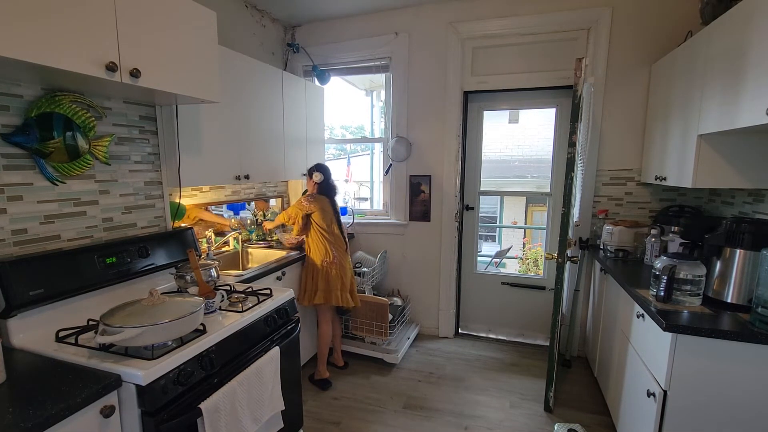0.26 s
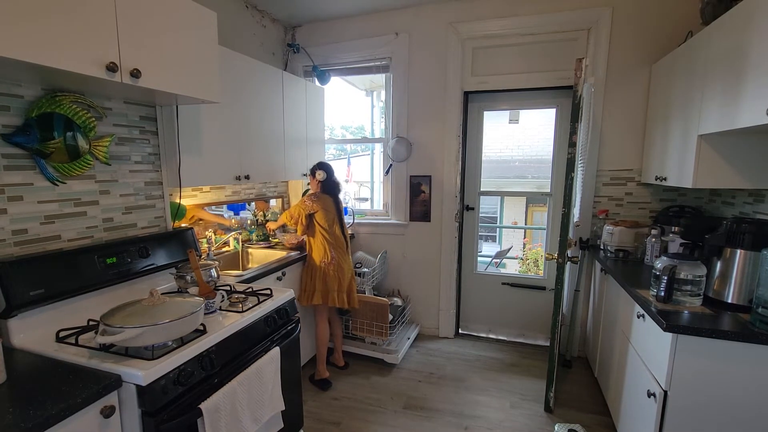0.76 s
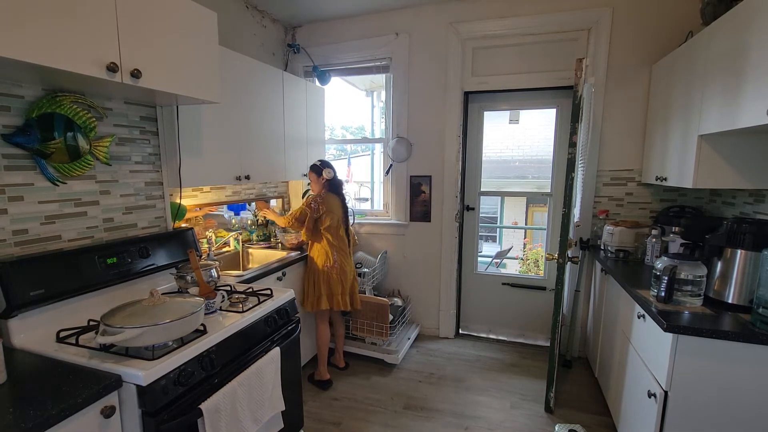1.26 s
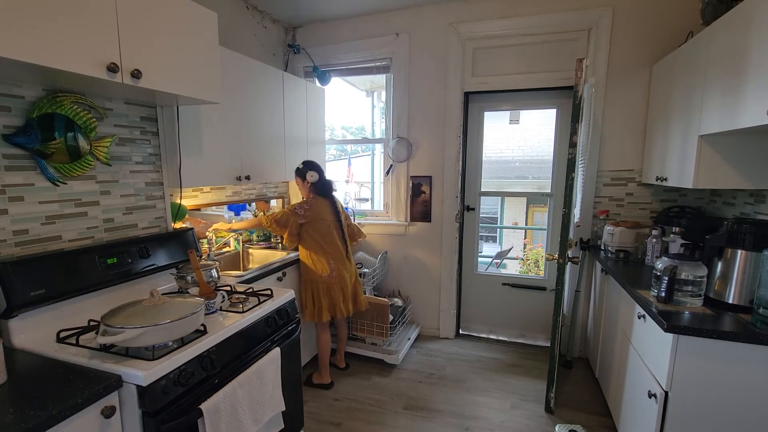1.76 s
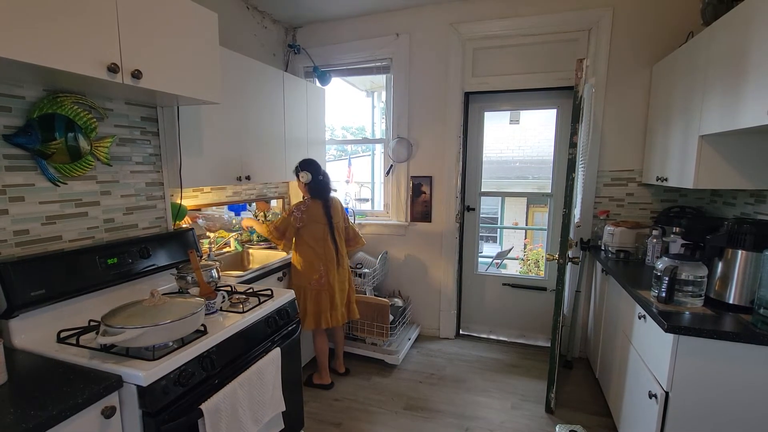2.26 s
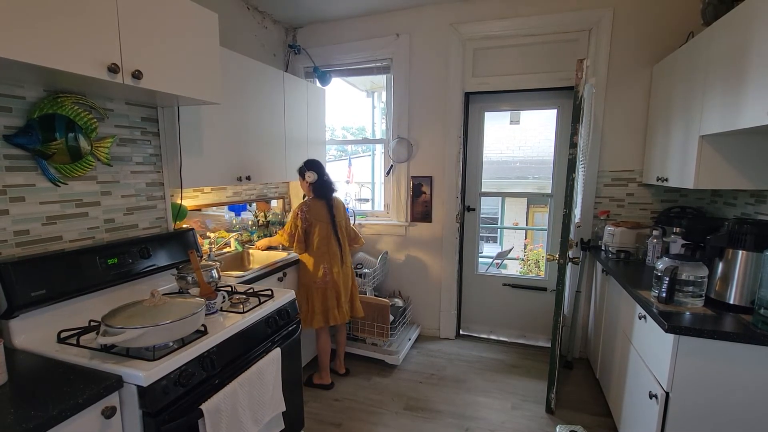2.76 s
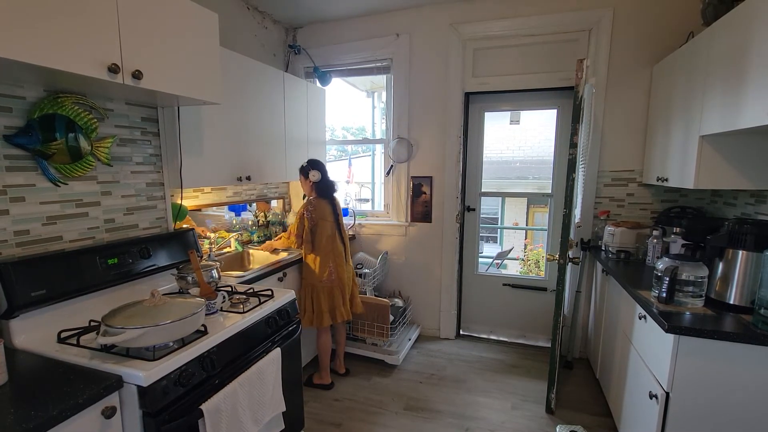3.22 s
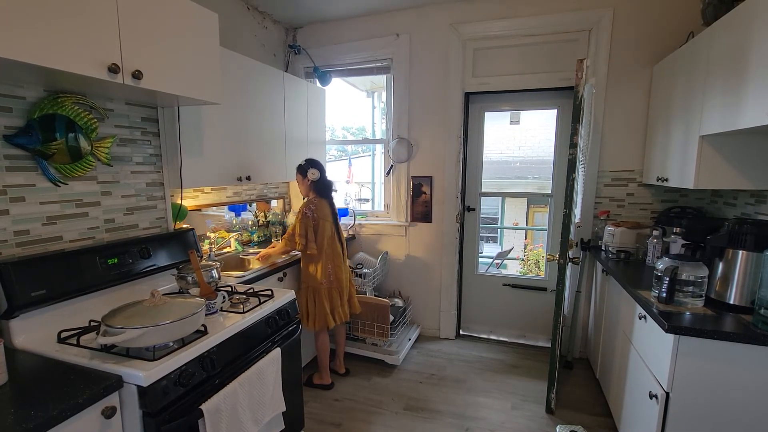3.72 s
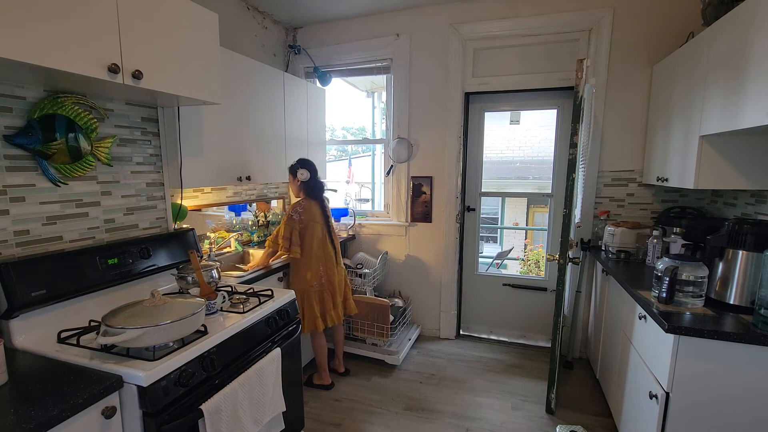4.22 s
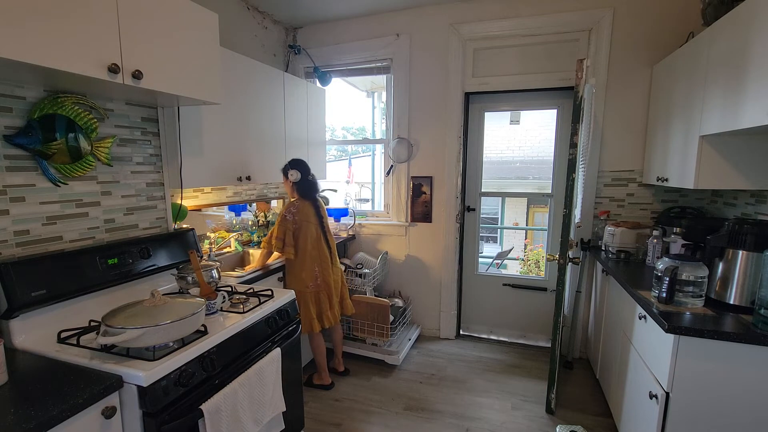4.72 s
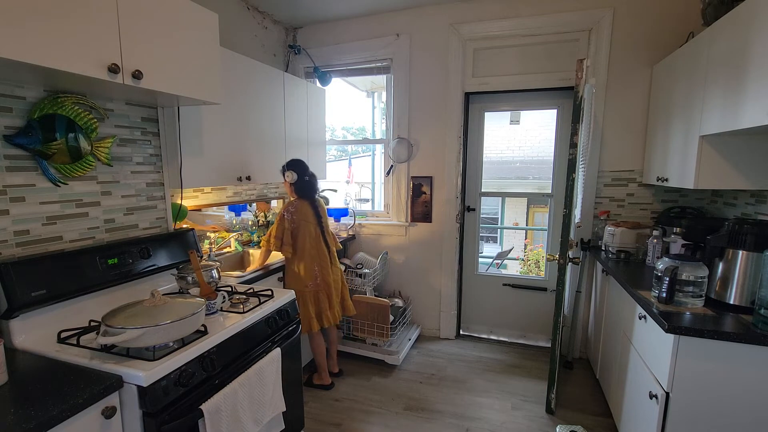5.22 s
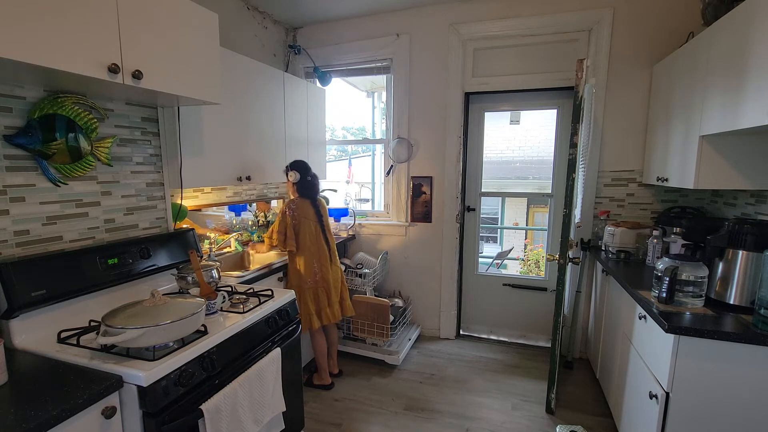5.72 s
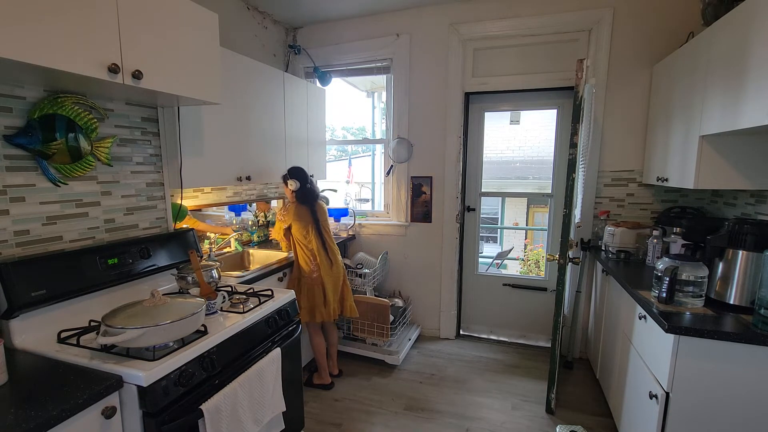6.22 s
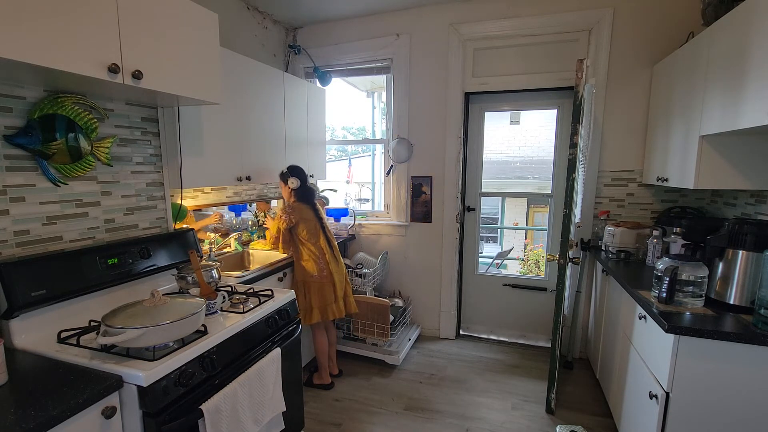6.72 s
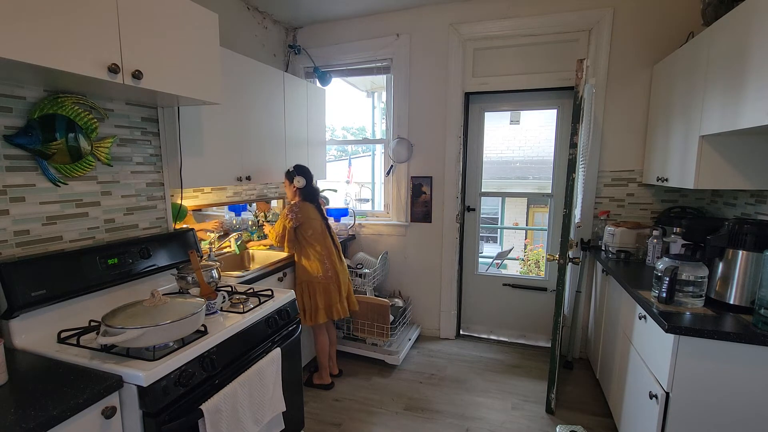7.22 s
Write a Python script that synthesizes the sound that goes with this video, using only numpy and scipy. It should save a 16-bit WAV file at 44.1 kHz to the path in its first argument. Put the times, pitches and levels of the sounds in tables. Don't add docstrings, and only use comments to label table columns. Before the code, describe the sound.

Running water stops after two seconds, followed by cups, plates and pans knocking brightly at a sink over a faint fridge hum.

```python
import sys
import numpy as np
from scipy import signal
from scipy.fft import rfft, irfft, next_fast_len
from scipy.io import wavfile
from scipy.ndimage import uniform_filter1d

SR = 44100
rng = np.random.default_rng(int(sys.argv[2]) if len(sys.argv) > 2 else 0)


def convert_level_to_amplitude(level_db):
    exponent = np.asarray(level_db, float) / 20
    return 10 ** exponent


def generate_wav(sig):
    pcm = np.round(np.clip(np.atleast_2d(sig).T, -1, 1) * 32767).astype(np.int16)
    wavfile.write(sys.argv[1], SR, pcm)


N = 329781

# (frequency [Hz], level per Hz [dB])
AIR_COLOUR = [(12, -58), (20, -17), (33, -15), (48, -3), (72, 2), (90, -29), (114, -4), (164, -10),
              (219, -6), (359, -6), (441, -12.5), (516, -10.5), (1040, -16.5), (1460, -21.5), (2100, -24),
              (3400, -27), (4700, -33), (6600, -33), (10000, -44.5), (13000, -68), (22000, -120)]
# (frequency [Hz], side minus mid [dB])
AIR_SIDE = [(60, -12.5), (110, -19), (200, -9.5), (380, -3), (700, 3.5), (1290, 7.5), (2380, 0.5),
            (4400, 0.5), (8120, 0.5), (15000, -1)]
AIR_DB, AIR_SWELL_DB = -55, 1
# (frequency [Hz], width [Hz], level [dB])
FRIDGE_HUM = [(63, 10, -4.5), (126, 15, -1.5)]
HUM_DB, HUM_WAVER_DB = -68, 5
FRIDGE_EASES_S, HUM_EASE_DB_PER_S, RUMBLE_EASE_DB_PER_S = 6.77, -27, -12
# (frequency [Hz], level [dB])
FAN_WHINE = [(529, -69.5), (1038, -74), (1759, -90), (1942, -83), (2811, -87), (3148, -88), (3506, -87),
             (3978, -88)]
FAN_WIDTH_HZ = 14.5
# (time of most weight [s], length [s], level [dB])
FOOTING = [
    (0.397, 0.09, -57),
    (0.53, 0.22, -49),
    (1.03, 0.091, -44.5),
    (1.283, 0.45, -50.5),
    (1.642, 0.51, -49),
    (6.9, 0.22, -67),
]

# (time [s], flow [dB])
TAP_FLOW = [
    (0.0, -54.5),
    (1.69, -55),
    (2.06, -60),
    (2.1, -64),
    (2.16, -65.5),
    (2.3, -92),
]
# (frequency [Hz], level per Hz [dB])
JET_COLOUR = [(350, -6), (600, -1), (832, -10), (1030, -7.5), (1490, -7), (1910, -3.5), (2280, -10.5),
              (2790, -8), (3160, -10), (3420, -7.5), (4430, -10.5), (7140, -8), (11000, -12.5),
              (13000, -11.5), (15500, -11.5)]
# (frequency [Hz], side minus mid [dB])
JET_SIDE = [(60, -12), (110, -15), (200, -9), (380, -4), (700, -7), (1290, 1.5), (2380, 1), (4400, 1),
            (8120, 0), (15000, 0)]
JET_FLICKER_DB = 1
# (frequency [Hz], width [Hz], level [dB])
BASIN_SONG = [(553, 14, 1.5), (1620, 40, -2), (1914, 24, 1.5), (2805, 27, -1.5), (3620, 250, -9),
              (3970, 27, -4)]
BASIN_STOPS_S, BASIN_FADE_S = 1.99, 0.1

# (frequency [Hz], t60 [s])
WALL_T60 = [(100, 0.17), (250, 0.47), (700, 0.33), (2500, 0.4), (6000, 0.39), (12000, 0.38)]
# (frequency [Hz], level [dB])
WALL_COLOUR = [(150, -12), (240, 1), (300, -1), (600, 4), (1200, -1.34), (2400, -0.7), (4000, 2.5),
               (7000, 5), (11000, -2), (13500, -4), (16000, -3.5)]
# (frequency [Hz], side minus mid [dB])
WALL_SIDE = [(60, -6), (110, -21), (200, -6.5), (380, -2), (700, 0.5), (1290, 3.5), (2380, 1.5),
             (4400, 0.5), (8120, 0), (15000, 1)]
# (frequency [Hz], level [dB], t60 [s], left minus right [dB])
ROOM_MODES = [(65.7, -25.5, 0.46, -1), (123.6, -25, 0.32, 3), (162, -20, 0.26, -0.5),
              (193.9, -22.5, 0.29, -2), (233.3, -38.5, 1, -3)]

# (time [s], frequency [Hz], level [dB], t60 [s])
FREE_TONES = [(0.839, 628, -13, 0.076), (0.836, 2290, -34, 0.16), (2.355, 610, -20.5, 0.11),
              (2.53, 618, -38, 0.3), (3.44, 415, -36, 0.69), (3.44, 542, -40.5, 0.59),
              (3.637, 2635, -41.5, 0.14), (3.703, 637, -18, 0.082), (3.705, 2012, -26, 0.2),
              (3.705, 4070, -41, 0.23), (4.377, 531, -24.5, 0.3), (4.376, 1593, -37, 0.29),
              (5.29, 375, -31.5, 0.32), (5.29, 2104, -39, 0.49), (6.2, 529, -52, 0.2),
              (4.675, 752, -39, 0.15), (4.99, 2030, -43, 0.17), (5.361, 1010, -38, 0.27)]
# (time [s], level [dB], [(frequency [Hz], level [dB], t60
# [s])])
DISH_RINGS = [
    (3.268, -39.5, [(1400, -17, 0.22), (1620, -14, 0.23), (2600, -8, 0.14), (3047, -19, 1.1), (4160, -18, 0.43), (6029, -26, 0.37), (7607, -33, 0.51), (9070, -4, 0.21)]),
    (3.706, -30, [(2778, 0, 0.41), (4296, -1, 0.14), (3354, -14, 0.23), (4829, -3.5, 0.46), (5884, -5, 0.29), (7467, -11, 0.25), (8204, -11, 0.11), (9100, -7, 0.31), (9300, -18, 0.24), (10200, -21, 0.3), (11610, -30, 0.28), (12600, -24, 0.38)]),
    (4.379, -38, [(2150, -1.5, 0.51), (3040, 2, 0.34), (3500, 0, 0.2), (4247, -19, 0.51), (7224, -20, 0.57), (8845, -18, 0.42), (9523, -22, 0.35), (9927, -17, 0.19), (10860, -21, 0.2), (11910, -23, 0.26)]),
    (5.289, -35.5, [(1620, -8, 0.19), (1986, -16, 0.37), (2137, -4, 0.6), (2579, -5, 0.45), (2860, -4, 0.34), (3580, -8, 0.6), (4330, -17, 0.54), (5717, -12, 0.32), (7520, -12, 0.17)]),
              (0.838, -25, [(388, 0, 0.25), (526, -11, 0.2), (910, -10, 0.18), (267, -4, .2),
              (1750, -20, 0.22), (4140, -16.5, .13)]), (0.872, -27.5, [(701.4, 4, 0.22), (162, 1.5, 0.15)]),
              (2.354, -41, [(1070, -2, 0.25), (1490, -8, .25), (1970, -10, .18), (3740, -14, .3),
              (6860, -19, .11)]), (3.268, -35.5, [(648, 6, 0.085), (396, -4, 0.57)]),
              (4.512, -45, [(535, 3.5, 0.51), (1000, 1, 0.26)]), (4.378, -38.5, [(1000, 11.5, 0.093),
              (788, 2, 0.48)]), (4.945, -43, [(1480, 0, .3), (1690, -1, .3)]), (5.264, -32, [(183, 1, 0.22),
              (345, -5.5, 0.22), (1010, -6.5, 0.17)]), (4.736, -36, [(199.4, 5.5, 0.36)]),
              (6.199, -49, [(395, 3, .2), (638, -3, .15), (302, -7, .2)]), (4.43, -52, [(4760, -1, .3),
              (5600, -5, .3), (6300, -7, .3)]), (5.35, -58, [(4770, -1, .3), (6100, -6, .3)]),
              (1.145, -55, [(3930, -2, 0.28), (3700, -2, .2)]), (2.476, -30, [(182, 7, .08)]),
              (3.289, -26, [(181, 0.5, 0.11)]), (3.432, -26, [(204, -1, 0.051)]),
              (3.456, -22, [(183, 4, 0.11)]), (3.701, -24, [(180, 2, .08)]),
              (3.726, -19, [(172.5, 1, 0.115)]), (4.375, -26, [(180, -2.5, 0.103)]),
              (4.496, -33.5, [(189, 1.5, 0.24)]), (7.291, -53.5, [(2980, -1, .1), (963, 4, .1),
              (4300, -4, 0.088)]), (7.436, -56, [(2700, -2, .3), (6150, -5, .2), (9100, -4, .2)]),
              (7.457, -41.5, [(734, 1, .2), (1510, -1, .2), (4130, -2, .2)])]
TONE_WAVER_DB, RING_LONGEST_S = 6, 0.4

# (time [s], level [dB], frequency [Hz])
CABINET_BOOMS = [
    (0.837, -49, 72.7),
    (2.347, -21, 100),
    (2.449, -18, 87),
    (3.701, -44, 94.2),
    (4.375, -53, 95.5),
    (4.482, -27, 82),
    (5.28, -25, 81.02),
    (2.82, -38, 94),
    (6.07, -41, 100),
]
# (time [s], length [s], rasp [dB], thud
# [dB], body [dB])
DRAGS = [
    (2.681, 0.72, -62, -50, -51),
    (3.436, 0.091, -40.5, -41, -28),
    (4.621, 0.1, -29, -58, -46),
    (4.901, 0.18, -27.5, -43.5, -71),
]
# (frequency [Hz], width [Hz], level [dB])
DRAG_MODES = [
    [(1340, 16, 1), (1980, 43, -11), (2543, 85, 12), (3880, 55, 9)],
    [(1970, 32, -1), (2250, 37, -10), (4000, 120, -3), (4650, 55, 0), (5830, 140, -1), (7500, 130, -11)],
    [(1290, 30, 7), (1690, 120, 5), (2640, 45, 5.5), (3600, 69, 2.5), (4570, 27, -4), (5200, 340, -15),
     (5930, 43, -9), (9200, 53, -22)],
    [(1620, 180, -0.5), (2030, 94, -3), (2500, 34, 3.5), (3720, 110, -6), (4030, 37, -10.5),
     (5200, 400, -19), (6400, 43, -21), (7200, 88, -27)],
]
# (rise [share], fall [share], grit [dB], finest grit [dB])
DRAG_SHAPE = [
    (0.052, .074, -27, -38),
    (0.31, 0.13, -13, -13),
    (0.11, 0.082, -24, -24),
    (0.23, 0.45, -30, -34),
]

# (time [s],
# clack [dB], thud [dB], body [dB], tick [dB])
BLOWS = [(0.2728, -39, -9, -48, -16), (0.8345, -32.5, -6, 18.5, -19.5), (1.1429, -49.5, -11, -11, 1),
         (1.9836, -46.5, 11, -8, -3), (2.1306, -46, 0.5, -5.5, -12.5), (2.3509, -27.5, 15, 6, -15.5),
         (2.5152, -35, 12.5, 5.5, -14.5), (2.7998, -49, -4, -1, -17), (3.2632, -19, -4.5, -8, -17),
         (3.428, -31.5, 6, -4, -17), (3.634, -34.5, -26, -17, -20), (3.7008, -13, -5.5, -14, -9),
         (4.3377, -36.5, -13, -8, -11), (4.3746, -19.5, -0.5, -10, -14), (4.728, -30.5, 1, -5, -29),
         (5.2602, -32, -6, 2.5, -17), (5.2869, -18.5, -9.5, -12.5, -28), (6.1954, -74, 31, 32, -28),
         (7.289, -46, -10, -4, -15), (7.4562, -29, -21, -8, -21)]
# (time [s], clack [dB], thud [dB], body [dB])
BOUNCES = [(0.8737, -55, 27, 21), (2.0346, -42.5, -3, -28), (2.4502, -45, 17, 9.5),
           (2.4816, -48.5, 23.5, 7), (2.5514, -45.5, 22.5, 10.5), (2.5837, -56, 29, 18),
           (3.109, -63, 4, -17), (3.1939, -48, 11, -4), (3.2932, -26.5, -14, -1.5), (3.348, -31.5, 0, -2),
           (3.4613, -47, 6, -8), (3.7168, -23, 4.5, -9), (4.3927, -26.5, -14, -10), (4.4372, -29.5, 0, -10),
           (4.489, -36, 7.5, -5), (4.5192, -34.5, -20, -1.5), (4.885, -43.5, 1, -2.5),
           (5.045, -44.5, 3, -2), (5.366, -37, 1, -0.5), (6.2277, -69.5, 32, 3), (7.464, -32.5, -35, -2)]
# (time [s], clack [dB], thud [dB], body [dB], tick [dB])
CATCHES = [(0.893, -62, -3, 10, -22), (2.548, -40, 16.5, 2, -24), (3.303, -34.5, -18, -8, -17),
           (4.664, -30.5, -17, -19, -23), (4.682, -40, -16, -22, -22), (4.744, -39, 3.5, 6.5, -15),
           (4.945, -50, -21, -7, -12), (4.988, -37, -23, -19, -20), (5.015, -39, -21, -9, -20),
           (5.062, -44.5, -36, -1, -25), (5.276, -34, -14, -3, -18), (3.755, -28, -4, -18, -12),
           (3.796, -38, -15, -15, -16), (7.434, -46, -25, -29, -6), (5.47, -41.5, -20, -9, -28)]
BLOW_HZ = (170, 480, 1150, 2800, 9000)
BLOW_WIDTH_HZ = (170, 450, 800, 2700, 8000)
BOUNCE_TICK_DB = -20
KNOCK_SHARE, KNOCK_DB = 0.74, 2.5
TOP_HZ, TOP_DB = 15000, -2
# (time [s], level [dB], [(frequency [Hz], width [Hz], level [dB])])
STRUCK_DISHES = [
    (0.275, -56, [(3620, 48, -6), (5040, 36, -8), (5950, 28, 0)]),
    (0.835, -22, [(371, 85, 2), (890, 44, -1.5), (1210, 48, -0.5), (1830, 72, -6.5), (2250, 32, -14), (4100, 40, -11)]),
    (2.351, -25.5, [(626, 40, 2.5), (1050, 63, -9), (1480, 20, -10), (2060, 120, -12), (2610, 17, -2.5), (3680, 36, -4.5), (4160, 34, -4), (4850, 27, -6.5), (5200, 300, -23)]),
    (2.515, -38.5, [(700, 46, 8), (1580, 62, -8), (2250, 160, 0.5), (3700, 63, -5), (4300, 60, -5), (5300, 400, -15)]),
                 (3.265, -33, [(174, 34, -5), (1360, 56, 5), (1590, 35, 6.5), (2260, 81, 2), (2575, 29, 5), (3560, 34, 1.5), (4030, 58, 0), (4430, 38, -14), (4800, 100, -2.5), (5940, 55, -18), (7650, 42, -24)]),
    (3.43, -28, [(181, 34, 3), (533, 96, -17), (813, 31, -17)]),
    (3.637, -35.5, [(1540, 29, -1.5), (2550, 37, 0), (3930, 34, -7), (4260, 31, -3.5)]),
    (3.702, -17, [(174, 44, -2), (730, 93, -2.5), (1550, 31, -2), (2030, 32, -14), (2415, 320, -3), (4040, 150, -4), (5140, 39, -7), (5800, 69, -16), (6350, 63, -14), (7400, 40, -17), (8260, 66, -20), (8600, 86, -27)]),
                 (4.337, -45.5, [(1504, 27, 5), (2300, 25, 2), (3600, 31, 3), (4430, 63, 1.5)]),
    (4.377, -26, [(1620, 25, 1), (2710, 54, -13), (3060, 150, -16), (3660, 76, -14), (3970, 29, -1), (4720, 92, -5.5), (5750, 33, -19), (7500, 32, -16)]),
    (5.288, -36.5, [(372, 19, -5), (1510, 36, 5.5), (2030, 31, -13), (2680, 70, 3.5), (3570, 67, 1.5), (4360, 67, -13), (4770, 91, -2.5), (7630, 34, -21)]),
]

# (frequency [Hz], left minus right [dB])
PORT_BALANCE = [(30, -1.6), (60, -1), (125, -0.9), (250, -3), (500, 1), (1000, -1.1), (2000, 1),
                (4000, 0.3), (12000, 0)]
# (frequency [Hz], level per Hz [dB])
MIC_HISS = [(3000, -32), (7000, 2.5), (10000, -10), (13000, -1.5), (15700, -2.5)]
MIC_HISS_DB = -80


def read(table, hz):
    f, v = np.transpose(table)
    return np.interp(np.log(np.maximum(hz, 1)), np.log(f), v)


def unit(x):
    return x / np.sqrt(np.mean(x ** 2))


def shaped(x, gain):
    length = x.shape[-1]
    size = next_fast_len(length, True)
    x_long = np.concatenate([x, x[..., :size - length]], axis=-1)
    spectrum = rfft(x_long) * gain(np.fft.rfftfreq(size, 1 / SR))
    return irfft(spectrum, size)[..., :length]


def ports(size, gain, side):
    mid = shaped(rng.standard_normal(size), gain)
    dif = shaped(rng.standard_normal(size), lambda f: gain(f) * convert_level_to_amplitude(read(side, f)))
    return np.array([mid + dif, mid - dif]) / np.std(mid)


def humps(hz, peaks):
    return np.sqrt(sum(convert_level_to_amplitude(db) ** 2 / (1 + (2 * (hz - f) / w) ** 2) for f, w, db in peaks))


def resonance(x, hz, width):
    return unit(shaped(x, lambda f: humps(f, [(hz, width, 0)]) ** 2))


def dying(t, t60):
    return np.exp(-np.log(1000) * t / t60)


def walk(rate):
    k = int(SR / rate)
    held = np.repeat(rng.standard_normal(N // k + 1), k)
    return 0.81 * uniform_filter1d(uniform_filter1d(held, k), k)[:N]


def causal(db_per_hz, size=2048):
    cep = irfft(db_per_hz * np.log(10) / 20, size)
    cep[1:size // 2] *= 2
    cep[size // 2 + 1:] = 0
    return irfft(np.exp(rfft(cep)), size)


def add(track, s, x):
    i = int(s * SR)
    track[i:i + len(x)] += x[:N - i]


def air(flicker_db=3.5):
    bed = ports(N, lambda f: convert_level_to_amplitude(read(AIR_COLOUR, f)), AIR_SIDE)
    swell_db = AIR_SWELL_DB * walk(0.68)
    eased_s = np.maximum(np.arange(N) / SR - FRIDGE_EASES_S, 0)
    out = 0
    for hz in 15.6 * 2. ** np.arange(11):
        band = shaped(bed, lambda f: np.cos(np.pi / 2 * np.clip(np.log2(np.maximum(f, 1) / hz), -1, 1)) ** 2)
        ease_db = (hz < 70) * RUMBLE_EASE_DB_PER_S * eased_s
        breath_db = flicker_db * min(1, 400 / hz) * walk(11)
        out = out + band * convert_level_to_amplitude(ease_db + swell_db + breath_db)
    load_db = HUM_DB + HUM_WAVER_DB * walk(3.47) + HUM_EASE_DB_PER_S * eased_s
    for hz, width, db in FRIDGE_HUM:
        hum = resonance(rng.standard_normal(N), hz, width)
        out = out + convert_level_to_amplitude(db - AIR_DB + load_db) * hum
    return out * convert_level_to_amplitude(AIR_DB)


def fan():
    def whistles(f):
        return np.sqrt(sum(humps(f, [(hz, FAN_WIDTH_HZ, 0)]) ** 4 * convert_level_to_amplitude(db) ** 2 for hz, db in FAN_WHINE))

    return shaped(rng.standard_normal((2, N)), whistles) * np.sqrt(SR / FAN_WIDTH_HZ)


def shuffle():
    modes = [(136.7, 9.1, 1.5), (170, 80, -1.0), (224, 27, 0.5)]  # (frequency [Hz], width [Hz], level [dB])
    board = unit(shaped(rng.standard_normal(N), lambda f: humps(f, modes) ** 2))
    t = np.arange(N) / SR
    weight = sum(convert_level_to_amplitude(db) * np.clip(1 - np.abs(t - s) / (length / 2), 0, 1) for s, length, db in FOOTING)
    return board * weight * convert_level_to_amplitude(-5.0)


def tap(bubbles_per_s=350, cycles=7, bubble_db=-9, basin_db=-8):
    s, db = np.transpose(TAP_FLOW)
    t = np.arange(N) / SR
    flow = np.interp(t, s, convert_level_to_amplitude(db), right=0)
    hiss = ports(N, lambda f: convert_level_to_amplitude(read(JET_COLOUR, f)) * (f > 250), JET_SIDE)
    hiss = hiss * convert_level_to_amplitude(JET_FLICKER_DB * walk(20.7))
    basin = ports(N, lambda f: humps(f, BASIN_SONG) ** 2, JET_SIDE)
    basin = basin * convert_level_to_amplitude(basin_db + 1.5 * walk(4))
    basin = basin * np.clip((BASIN_STOPS_S - t) / BASIN_FADE_S, 0, 1)
    fizz, blip_t = np.zeros((2, N)), np.arange(512) / SR
    for when, pitch, loud, place in rng.random((int(bubbles_per_s * s[-1]), 4)):
        hz = 1200 * 7 ** pitch
        swing = np.sin(2 * np.pi * hz * blip_t * (1 + 0.0062 * hz * blip_t))
        blip = swing * np.exp(-3 * hz * blip_t / cycles) * (0.39 + loud)
        add(fizz[int(2 * place)], when * s[-1], blip)
    fizz = fizz / np.std(fizz[:, :int(s[-1] * SR)])
    return flow * convert_level_to_amplitude(2.54) * (hiss + basin + convert_level_to_amplitude(bubble_db) * fizz)


def standing_waves(t, build_ms=9):
    waves = 0
    for k, (hz, db, t60, pan_db) in enumerate(ROOM_MODES):
        port_gain = (-1) ** k * convert_level_to_amplitude(db + np.array([[pan_db], [-pan_db]]) / 2)
        waves = waves + port_gain * np.sin(2 * np.pi * hz * t) * dying(t, t60)
    return waves * (1 - np.exp(-(t * 1000 / build_ms) ** 2))


def kitchen(fill_ms=9, bass_fill_cycles=0.24, direct_db=6.5):
    size = int(0.7 * SR)
    t, out = np.arange(size) / SR, 0
    field = ports(size, lambda f: convert_level_to_amplitude(read(WALL_COLOUR, f)), WALL_SIDE)
    for hz in 40 * 2. ** np.arange(0, 9, .5):
        band = shaped(field, lambda f: np.cos(np.pi * np.clip(np.log2(np.maximum(f, 1) / hz), -.5, .5)) ** 2)
        swell = 1 - np.exp(-t / (fill_ms / 1000 + bass_fill_cycles / hz))
        out = out + band * swell * dying(t, read(WALL_T60, hz))
    out += standing_waves(t)
    out[:, :4] += convert_level_to_amplitude(direct_db) * np.array([0.72, 0.42, -0.24, -0.37])
    return out


def tones(table, rise_ms=4.6):
    out, t = np.zeros((2, N)), np.arange(SR // 2) / SR
    swell = 1 - np.exp(-t * 1000 / rise_ms)
    for (s, hz, db, t60), phase in zip(table, rng.random(len(table))):
        port_phase = 2 * (phase - .5) * min(1, hz / 600)
        for port in range(2):
            ring = np.sin(2 * np.pi * hz * t + port * port_phase) * dying(t, t60)
            add(out[port], s, convert_level_to_amplitude(db) * ring * swell)
    return out * convert_level_to_amplitude(TONE_WAVER_DB * np.array([walk(40.0), walk(40.0)]))


def booms(t60=0.023):
    out, t = np.zeros(N), np.arange(SR // 4) / SR
    for s, db, hz in CABINET_BOOMS:
        swing = np.sin(2 * np.pi * hz * t) * dying(t, t60)
        add(out, s, convert_level_to_amplitude(db - 13.5) * swing / np.linalg.norm(swing))
    return out


def slides(slips_per_s=2500, scatter_db=4.5, broad_db=-14, damping=1.4):
    out = np.zeros(N)
    for drag_row, modes, shape in zip(DRAGS, DRAG_MODES, DRAG_SHAPE):
        s, length, rasp_db, thud_db, body_db = drag_row
        rise, fall, grit_db, fine_db = shape
        gone = np.arange(0, 1, 1 / (length * SR))
        push = np.clip(np.minimum(gone / rise, (1 - gone) / fall), 0, 1)
        chance = rng.standard_normal((3, SR))
        clicks = (np.abs(chance[0]) < slips_per_s / SR) * chance[1] * convert_level_to_amplitude(scatter_db * chance[2])
        peaks = [(hz, damping * max(width, 90), db) for hz, width, db in modes] + [(2350, 410, broad_db)]
        drag = convert_level_to_amplitude(rasp_db) * unit(shaped(clicks, lambda f: humps(f, peaks)))
        drag += convert_level_to_amplitude(thud_db) * resonance(clicks, 191.5, 81)
        drag += convert_level_to_amplitude(body_db) * resonance(clicks, 610, 1800)
        drag += convert_level_to_amplitude(rasp_db + grit_db) * resonance(clicks, 7000, 9900)
        drag += convert_level_to_amplitude(rasp_db + fine_db) * resonance(clicks, 14000, 5000)
        add(out, s, drag[:len(push)] * push)
    return out * convert_level_to_amplitude(-40.5)


def knocks(hits, contact_ms=4.0, damping=2.15, ring_db=22):
    out, hz = np.zeros(N), np.fft.rfftfreq(4096, 1 / SR)
    per_hz = 10 * np.log10(SR / 2 / np.array(BLOW_WIDTH_HZ))
    for (s, db, thud, body, tick), wait in zip(hits, rng.random((len(hits), 65))):
        knock = KNOCK_SHARE * body + KNOCK_DB
        colour = list(zip(BLOW_HZ, db + np.array([thud, body, knock, 0, tick]) + per_hz))
        colour.append((TOP_HZ, colour[-1][1] + TOP_DB))
        power = convert_level_to_amplitude(read(colour, hz)) ** 2
        for struck, blow_db, modes in STRUCK_DISHES:
            if abs(struck - s) < .008:
                damped = [(f, damping * max(w, 40), g) for f, w, g in modes]
                power += (convert_level_to_amplitude(blow_db + ring_db) * humps(hz, damped) ** 2) ** 2
        delay = np.interp(hz, np.linspace(0, SR / 2, len(wait)), wait) * contact_ms / 1000
        contact = irfft(np.exp(-2j * np.pi * np.cumsum(delay) * hz[1]))[:1024]
        add(out, s, signal.fftconvolve(contact, causal(10 * np.log10(power), size=4096)))
    return out * convert_level_to_amplitude(-8.5)


def scene():
    small = signal.butter(3, 105, "high", fs=SR, output="sos")
    dishes = knocks(BLOWS + [row + (BOUNCE_TICK_DB,) for row in BOUNCES]) + slides()
    room = kitchen()
    under = tap() + air() + shuffle() + tones(FREE_TONES)
    ring_modes = [(s, hz, db + mode_db, min(t60, RING_LONGEST_S))
                  for s, db, modes in DISH_RINGS for hz, mode_db, t60 in modes]
    rings = tones(ring_modes, rise_ms=6.0)
    dishes = signal.sosfilt(small, dishes + knocks(CATCHES)) + booms()
    return signal.fftconvolve(dishes[None], room, axes=1)[:, :N] + under + rings + fan()


def top_cut(x):
    return signal.sosfilt(signal.butter(12, 16490, fs=SR, output="sos"), x)


def record(dry):
    hiss = shaped(rng.standard_normal(dry.shape), lambda f: convert_level_to_amplitude(read(MIC_HISS, f)))
    ported = shaped(dry, lambda f: convert_level_to_amplitude(read(PORT_BALANCE, f) * np.array([[.5], [-.5]])))
    top = signal.ellip(8, .2, 60, 15600, fs=SR, output="sos")
    heard = signal.sosfilt(top, ported + convert_level_to_amplitude(MIC_HISS_DB + 5.0) * unit(hiss))
    return top_cut(heard)


dry = scene()
out = record(dry)
generate_wav(out)
```